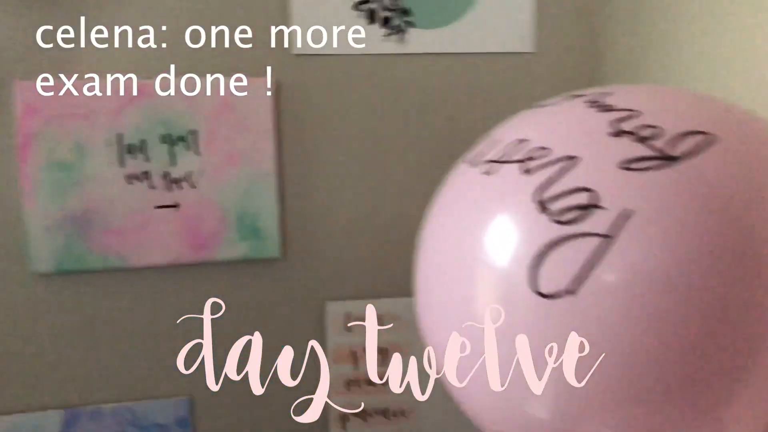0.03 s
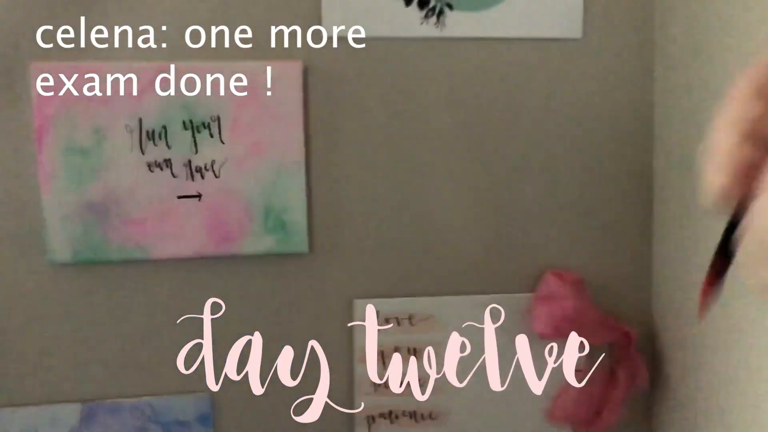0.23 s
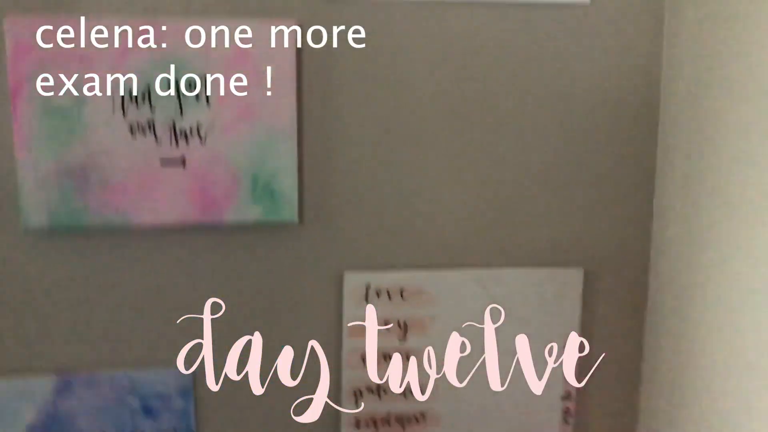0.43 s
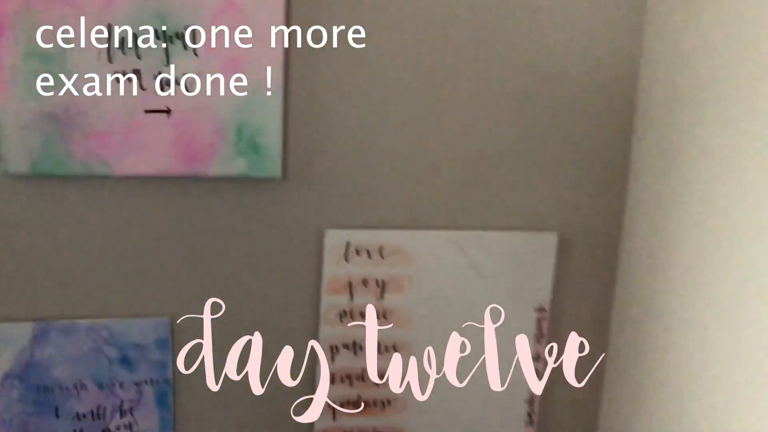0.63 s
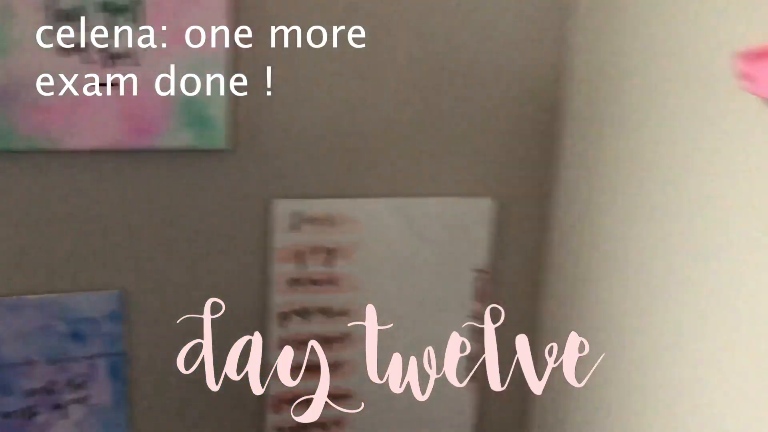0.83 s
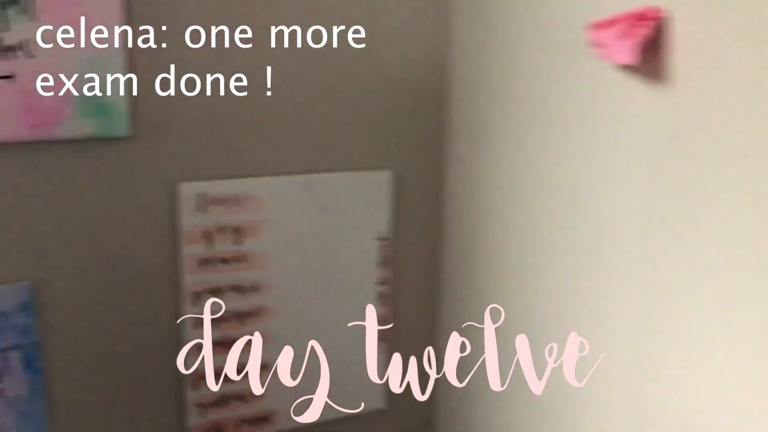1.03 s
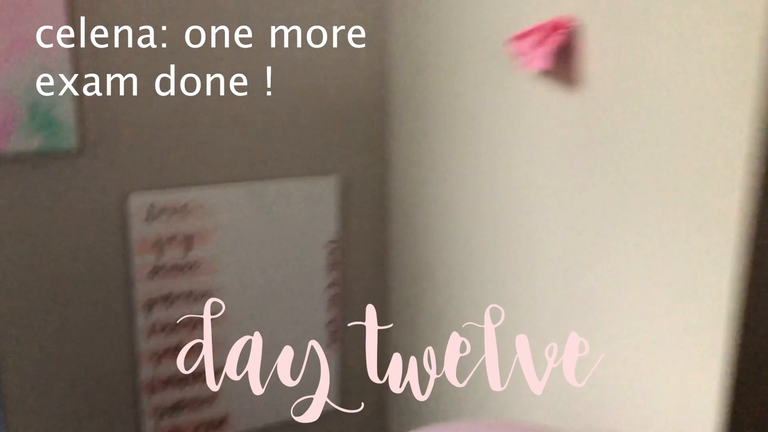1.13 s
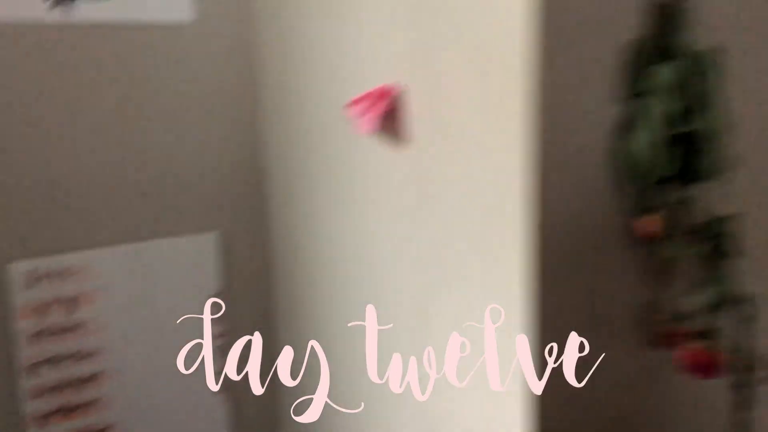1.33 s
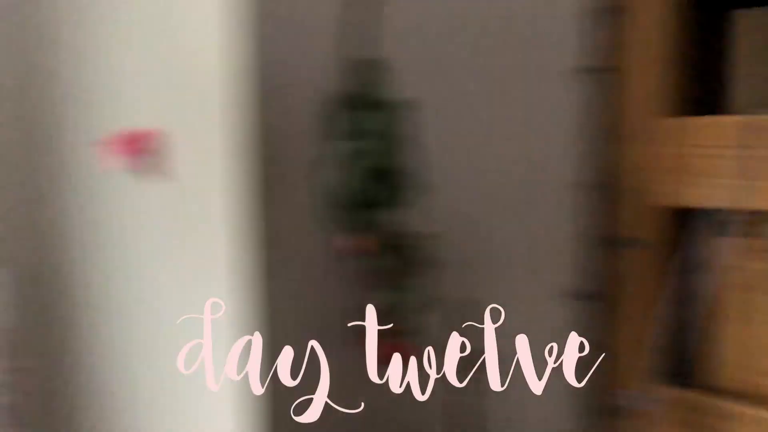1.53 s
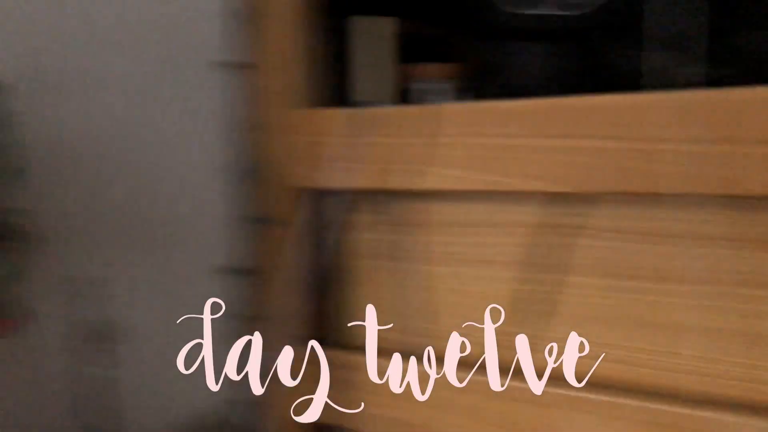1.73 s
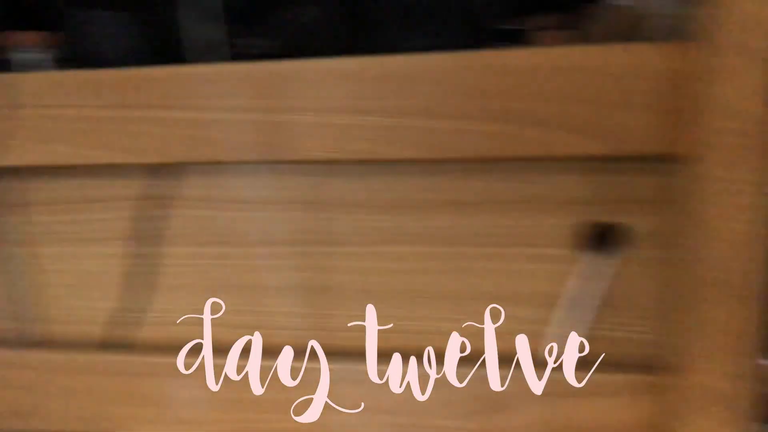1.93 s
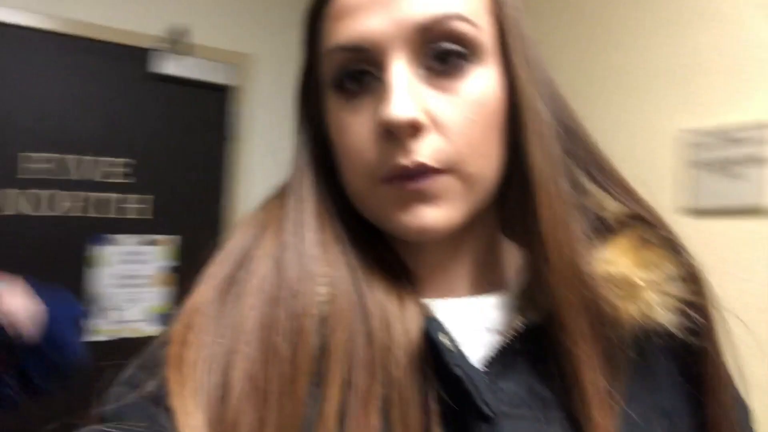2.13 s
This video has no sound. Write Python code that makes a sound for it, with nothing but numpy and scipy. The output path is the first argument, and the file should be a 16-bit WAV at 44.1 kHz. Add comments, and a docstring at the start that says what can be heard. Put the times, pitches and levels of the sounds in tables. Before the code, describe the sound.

A balloon pops with one sharp, loud bang at about 0.25 seconds, close by, just after a soft handling thump. The small room reverberates briefly, and faint low tones ring on until about 1.8 seconds. A soft rustle comes near 0.8 seconds. From 1.3 seconds to just past 2, faint rustles, ticks and dull handling thumps follow over a quiet background hiss.

```python
"""A soft handling thump, then a pin taps a balloon and it bursts, close by in a small furnished room.
The taut skin rings, snaps and tears, and the sudden release of pressure sends out a blast of air.
The room reverberates briefly and a few low tones ring on. Small rustles, ticks and further
handling thumps follow over a quiet background hiss."""
import sys
import numpy as np
from scipy import signal
from scipy.fft import rfft, irfft
from scipy.io import wavfile
from scipy.ndimage import uniform_filter1d

SR = 44100
rng = np.random.default_rng(int(sys.argv[2]) if len(sys.argv) > 2 else 0)


def transcribe(signal):
    """Save signal, clipped to [-1, 1], as a 16-bit WAV file at the path in sys.argv[1]."""
    frames = np.atleast_2d(signal).T
    limited = np.clip(frames, -1, 1)
    pcm = np.round(limited * 32767).astype(np.int16)
    wavfile.write(sys.argv[1], SR, pcm)


N = 97020
TEAR_S, BLAST_S = .2519, .2531


def amp(db):
    return 10 ** (np.asarray(db) / 20)


def unit_rms(x):
    return x / np.sqrt(np.mean(x ** 2) + 1e-20)


def add(mix, start_s, sound):
    part = mix[max(round(start_s * SR), 0):][:len(sound)]
    part += sound[:len(part)]


def decay(t, t60, hold_s=0):
    """Exponential damping: unity until hold_s, then 60 dB down every t60 seconds."""
    return amp(-60 * np.maximum(t - hold_s, 0) / t60)


def damped_modes(modes, seconds=.4, scatter=0):
    """Modal superposition: damped sines, their phases spread over `scatter` cycles."""
    t = np.arange(0, seconds, 1 / SR)
    return sum(amp(db) * decay(t, t60) * np.sin(2 * np.pi * (hz * t + scatter * rng.random()))
               for hz, db, t60 in modes)


def spectral_gain(spectrum, hz):
    points_hz, db = np.transpose(spectrum)
    return amp(np.interp(np.log(hz + 1), np.log(points_hz + 1), db))


def coloured_noise(spectrum, size):
    """Spectral shaping: white noise filtered to the given spectrum, at unit rms."""
    gain = spectral_gain(spectrum, np.fft.rfftfreq(size, 1 / SR))
    return unit_rms(irfft(rfft(rng.standard_normal(size)) * gain, size))


# deep push of the blast (frequency [Hz], level [dB], T60 [s])
PUSH_MODES = [(56.6, -24.5, 0.065), (93.5, -20, .11)]
def air_blast(start_hz=490, settled_hz=135, glide_s=.0038, steepness=2.4):
    """Pressure release: freed air swings, slower as it spreads; nonlinearity flattens the crests."""
    out, t = np.zeros(N), np.arange(0, .1, 1 / SR)
    hz = settled_hz + (start_hz - settled_hz) * np.exp(-t / glide_s)
    swing = np.sin(2 * np.pi * np.cumsum(hz) / SR)
    flattened = np.tanh(steepness * swing) / np.tanh(steepness)
    envelope = np.sqrt(np.minimum(t / .0012, 1)) * decay(t, t60=.021, hold_s=.0037)
    add(out, BLAST_S, amp(-6.5) * envelope * flattened)
    add(out, TEAR_S, damped_modes(PUSH_MODES))
    return out


# spectrum of tearing rubber (frequency [Hz], relative spectral density [dB])
TEAR_SPECTRUM = [(500, -16), (900, 0.5), (1700, 2.5), (2500, -1.5), (3500, -3), (6000, -1.5), (8500, -5),
                 (11000, -12), (16000, -9.5)]
def rubber_tear():
    """Fracture: the ripping skin radiates a few milliseconds of broadband noise."""
    out, t = np.zeros(N), np.arange(0, .1, 1 / SR)
    envelope = np.minimum(t / .0002, 1) * decay(t, t60=.02, hold_s=.0037)
    add(out, TEAR_S, amp(-14) * envelope * coloured_noise(TEAR_SPECTRUM, len(t)))
    return out


# snaps of the rubber (time [s], peak level [dB], carrier frequency [Hz])
RUBBER_SNAPS = [(0.2277, -29, 9000), (0.2292, -25.5, 5360), (0.2324, -30, 2970), (0.2361, -35.5, 5976),
                (0.2399, -33, 7977), (0.2418, -31, 4900), (0.2458, -23.5, 6000), (.2464, -13, 3500),
                (.2483, -13, 8000), (0.2508, 0, 7900), (0.2666, -25, 11050)]
def rubber_snaps(width_cycles=.75, fizz_db=-9):
    """Impulsive radiation: each snap is a pulse under a cycle wide, hence broadband, trailing fizz."""
    out, t = np.zeros(N), np.arange(0, .1, 1 / SR)
    lead_s = 20 / SR
    from_peak = t[:200] - lead_s
    for s, db, hz in RUBBER_SNAPS:
        window = np.exp(-(from_peak * hz * 2 / width_cycles) ** 2)
        add(out, s - lead_s, -amp(db) * window * np.cos(2 * np.pi * hz * from_peak))
        fizz = decay(t, t60=.012) * coloured_noise(TEAR_SPECTRUM, len(t))
        add(out, s, amp(db + fizz_db) * fizz)
    return out


# modes of the taut balloon (frequency [Hz], relative level [dB], T60 [s])
SKIN_MODES = [(150.5, -2, 0.16), (281, -2.5, .06), (508, -2.5, .04), (794, -5.5, .03)]
# taps on the skin (time [s], gain [dB])
SKIN_TAPS = [(0.2289, -29.5), (0.2401, -20.5), (0.2482, -15)]
def skin_taps(rise_s=.0011):
    """Free vibration of a membrane: every tap excites the same damped modes."""
    out, t = np.zeros(N), np.arange(0, .1, 1 / SR)
    tap = damped_modes(SKIN_MODES, seconds=.1) * np.minimum(t / rise_s, 1) ** 2
    for s, db in SKIN_TAPS:
        add(out, s, amp(db) * tap)
    return out


# colour of the reverberation (frequency [Hz], relative spectral density [dB])
REVERB_SPECTRUM = [(60, -31), (130, -11.5), (230, -5), (550, -13.5), (900, -17.5), (1350, -17.5),
                   (1600, -22), (2700, -25.5), (5600, -24.5), (10000, -28.5), (16000, -35)]
# reverberation time by band (frequency [Hz], T60 [s])
REVERB_TIMES = [(60, 0.45), (150, 0.13), (400, .18), (1000, .14), (4000, 0.16), (12000, .13)]
# resonances of the room (frequency [Hz], relative level [dB], T60 [s])
STANDING_WAVES = [(149.2, -9.5, .3), (176.1, -6.5, 0.22), (206.5, 0, 0.24), (297, -5, 0.1), (333, 1, 0.23),
                  (358, -8.5, 0.12), (458, -4.5, .14), (496.1, -10, 0.097), (543, -8.5, 0.094),
                  (688, -12, 0.17), (1270, -13, 0.11)]
def reverberation(early_share=.2, uneven_db=2):
    """Absorption: reflections of the bang die at each band's own rate, over the room's low modes."""
    out, t, hz = np.zeros(N), np.arange(SR) / SR, np.fft.rfftfreq(SR, 1 / SR)
    spectrum = rfft(coloured_noise(REVERB_SPECTRUM, SR))
    centres_hz, t60s = np.transpose(REVERB_TIMES)
    bands = [np.interp(np.log(hz + 1), np.log(centres_hz), row) for row in np.eye(len(t60s))]
    tail = sum(irfft(spectrum * band, SR) * decay(t, t60) for band, t60 in zip(bands, t60s))
    lumps = unit_rms(uniform_filter1d(rng.standard_normal(SR), round(.0025 * SR)))
    tail *= amp(uneven_db * lumps)  # separate reflections make the decay uneven
    modes = damped_modes(STANDING_WAVES, seconds=1, scatter=.93)
    build_up = np.sin(np.pi / 2 * np.clip((t - .011) / .036, 0, 1)) ** 2
    onset = np.minimum(t / .004, 1) * (early_share + (1 - early_share) * build_up)
    add(out, BLAST_S, onset * (amp(-9) * tail + amp(-15.5) * modes))
    return out


# two long, wavering tones (time [s], lower tone level [dB], upper tone level [dB])
LONG_TONE_LEVELS = [(0.44, -63, -64), (0.588, -65, -68.5), (0.64, -82, -77.5), (0.714, -69, -69.5),
                    (0.796, -71, -71), (0.878, -66, -81), (0.962, -69, -70.5), (1.122, -83, -77.5),
                    (1.158, -68, -73), (1.24, -79, -70.5), (1.314, -70.5, -70), (1.46, -93.5, -77),
                    (1.5, -71.5, -64.5), (1.668, -86, -78.5), (1.688, -94, -72), (1.728, -77, -71.5),
                    (1.806, -95, -95), (1.85, -83, -80)]
# tones that die sooner (frequency [Hz], level [dB], T60 [s])
SHORT_TONES = [(218, -44.5, 0.43), (183, -49.5, 0.27), (255, -51.5, 0.82), (286.6, -50.5, .9)]
def lingering_tones(long_tones_hz=(141.5, 322.2)):
    """Resonance: low tones set going by the bang ring on after it."""
    out, t = np.zeros(N), np.arange(N) / SR
    times, *levels = np.transpose(LONG_TONE_LEVELS)
    fade = np.clip((t - BLAST_S) / .046, 0, 1) * np.clip((times[-1] - t) / .11, 0, 1)
    for hz, db in zip(long_tones_hz, levels):
        rms = amp(uniform_filter1d(np.interp(t, times, db), size=1500))
        out += np.sqrt(2) * fade * rms * np.sin(2 * np.pi * hz * t)
    add(out, BLAST_S, damped_modes(SHORT_TONES, seconds=.92, scatter=1))
    return out


# rustles and ticks (time [s], level [dB], centre [Hz], bandwidth [Hz], rise [s], T60 [s])
RUSTLE_BURSTS = [(.463, -73.5, 10900, 9000, .008, 0.077), (.481, -75.5, 2505, 3000, 0.00085, 0.077),
                 (.716, -71.5, 7880, 12000, .004, 0.08), (.755, -75, 7990, 12000, .004, 0.12),
                 (0.795, -56.5, 11000, 8000, .0003, 0.031), (.799, -55, 2700, 3000, .009, .11),
                 (0.799, -58, 8760, 10900, 0.0044, 0.114), (.803, -59, 4750, 900, 0.0015, 0.037),
                 (.806, -61, 790, 1000, 0.0049, 0.095), (.981, -72.5, 3110, 1000, .002, 0.046),
                 (1.14, -77, 7977, 14010, .04, .3), (1.295, -75.5, 12000, 8000, 0.009, 0.14),
                 (1.311, -67, 7520, 6007, .0005, .1), (1.388, -68.5, 5010, 10000, 0.0036, 0.18),
                 (1.415, -70.5, 5000, 5000, .008, 0.18), (1.39, -76.5, 12930, 6010, 0.021, 0.38),
                 (1.443, -66, 3546, 2490, 0.00098, .07), (1.495, -70, 6020, 9900, 0.0069, .15),
                 (1.583, -63.5, 8000, 14000, 0.0071, 0.07), (1.591, -64.5, 1067, 1797, 0.0088, 0.079),
                 (1.774, -65, 2000, 2200, .001, .06), (1.878, -71, 3667, 2972, 0.018, .25),
                 (2.014, -77, 3004, 4000, 0.0039, 0.063), (2.104, -56.5, 960, 595, 0.0006, 0.026),
                 (2.104, -71, 3000, 6000, 0.00049, .02), (2.16, -70, 1500, 2000, 0.0029, 0.057)]
def rustles():
    """Band-limited noise transients: abrupt ones are heard as ticks, gradual ones as rustles."""
    out, t = np.zeros(N), np.arange(8192) / SR
    hz = np.fft.rfftfreq(len(t), 1 / SR)
    for s, db, centre_hz, width_hz, rise_s, t60 in RUSTLE_BURSTS:
        band = 1 / (1 + (2 * (hz - centre_hz) / width_hz) ** 4)
        noise = unit_rms(irfft(rfft(rng.standard_normal(len(t))) * band))
        envelope = np.minimum(t / rise_s, 1) * decay(t, t60, hold_s=rise_s)
        add(out, s, amp(db) * envelope * noise)
    return out


# soft thumps (time [s], level [dB], frequency [Hz], T60 [s])
HANDLING_THUMPS = [(.0, -46.5, 63.4, 0.081), (1.508, -62.5, 128.3, 0.088), (1.64, -63.5, 55, .1),
                   (1.829, -54.5, 55.27, 0.17), (2.035, -53, 52, .2)]
def handling_thumps(rise_s=.0046):
    """Damped oscillation: each handling bump excites one low mode."""
    out, t = np.zeros(N), np.arange(0, .4, 1 / SR)
    for s, db, hz, t60 in HANDLING_THUMPS:
        add(out, s, damped_modes([(hz, db, t60)]) * np.minimum(t / rise_s, 1))
    return out


# colour of the background hiss (frequency [Hz], relative spectral density [dB])
HISS_SPECTRUM = [(25, -14), (60, -4), (120, -1.5), (250, -5), (400, -13), (500, -13), (734, -18),
                 (1400, -21.5), (5000, -27.5), (9000, -32), (12500, -32), (16000, -29)]
# level of the background hiss (time [s], bass gain [dB], treble gain [dB])
HISS_LEVELS = [(0, 5, 9.5), (.08, -0.5, 5.5), (.16, 3.5, 11), (.23, 0.5, 11.5), (0.401, -5.5, -2.5),
               (.6, 2, -9.5), (.75, -4, -1), (.9, -2, -3), (1.3, -1.5, -1.2), (1.5, 1, 0.5),
               (1.8, 1.5, 0.3), (2.2, 1.5, -2)]
def background_hiss(level_db=-66.5, crossover_hz=390, patchy_db=1.6):
    """Amplitude-modulated noise: a patchy hiss, louder before the pop, dipping after, then returning."""
    frames, hz = N // 256 + 5, np.fft.rfftfreq(1024, 1 / SR)[:, None]
    real, imag, patches = rng.standard_normal((frames, len(hz), 3)).T
    patches = unit_rms(uniform_filter1d(uniform_filter1d(patches, 14, axis=0), 10, axis=1))
    spectra = (real + 1j * imag) * spectral_gain(HISS_SPECTRUM, hz) * amp(patchy_db * patches)
    times, bass_db, treble_db = np.transpose(HISS_LEVELS)
    t = np.arange(frames) * 256 / SR
    treble = hz ** 2 / (hz ** 2 + crossover_hz ** 2)
    gain_db = (1 - treble) * np.interp(t, times, bass_db) + treble * np.interp(t, times, treble_db)
    _, steady = signal.istft(spectra, nperseg=1024, noverlap=768)
    _, modulated = signal.istft(spectra * amp(gain_db), nperseg=1024, noverlap=768)
    return amp(level_db) * modulated[:N] / np.std(steady)


def scene():
    """Superposition: the pressures of all sources add in one channel."""
    pop = rubber_snaps() + skin_taps() + rubber_tear() + air_blast()
    ringing_pop = pop + reverberation() + lingering_tones()
    return (ringing_pop + rustles() + handling_thumps() + background_hiss())[None]


def record(dry, ceiling=.95, low_hz=35, high_hz=15850):
    """Saturation and band limiting: loud peaks are rounded; deep bass and top treble are cut."""
    clipped = ceiling * np.tanh(dry / ceiling)
    bass_cut = signal.butter(2, low_hz, "high", fs=SR, output="sos")
    treble_cut = signal.firwin(511, high_hz, window=("kaiser", 9), fs=SR)
    return signal.oaconvolve(signal.sosfilt(bass_cut, clipped), treble_cut[None], "same")


dry = scene()
out = record(dry)
transcribe(out)
```